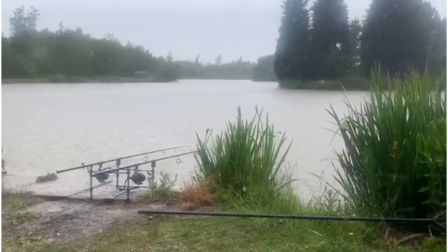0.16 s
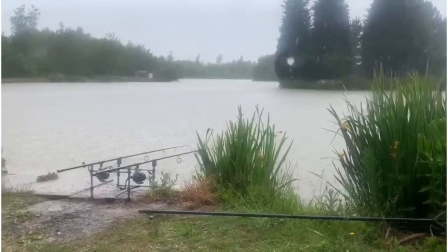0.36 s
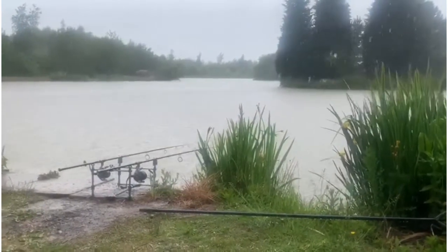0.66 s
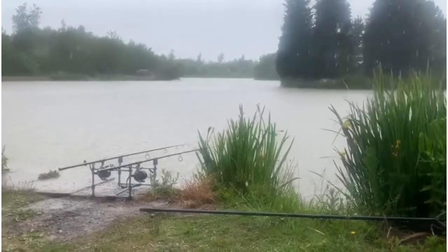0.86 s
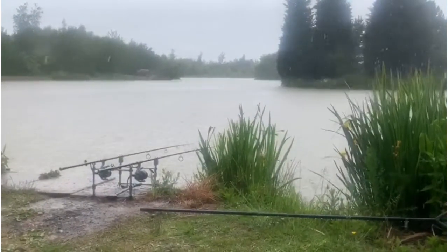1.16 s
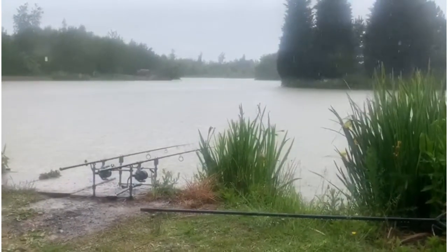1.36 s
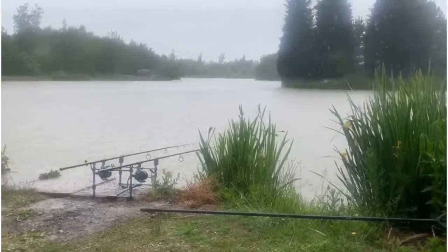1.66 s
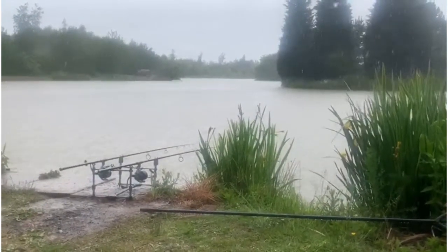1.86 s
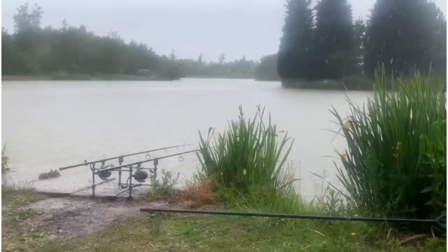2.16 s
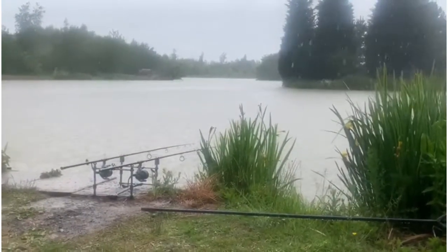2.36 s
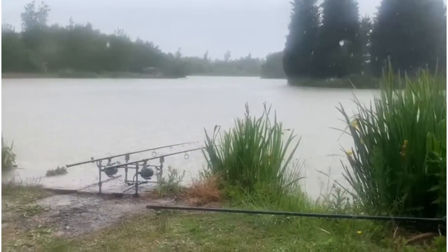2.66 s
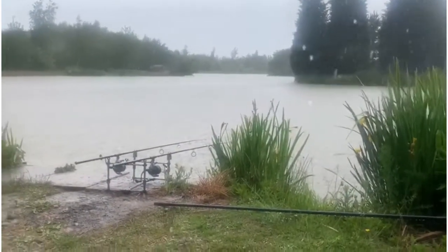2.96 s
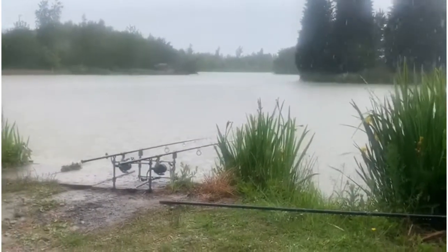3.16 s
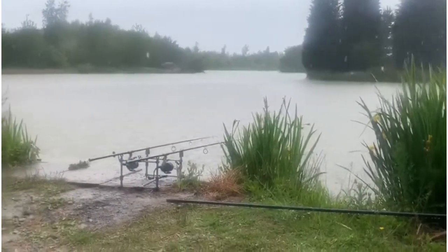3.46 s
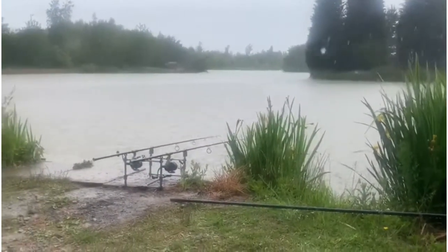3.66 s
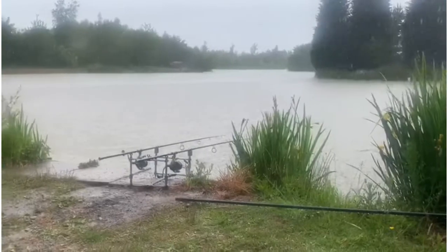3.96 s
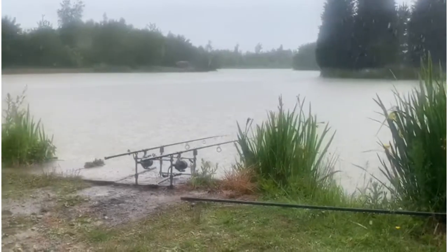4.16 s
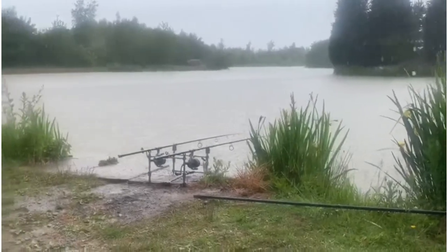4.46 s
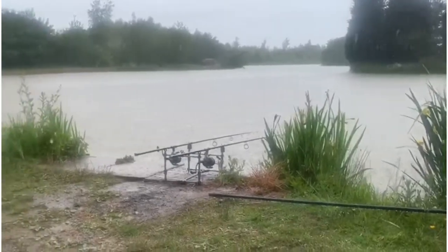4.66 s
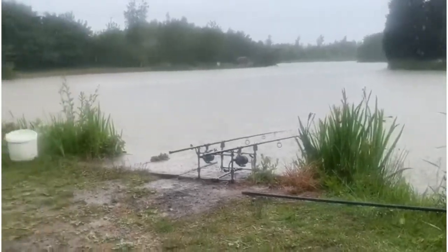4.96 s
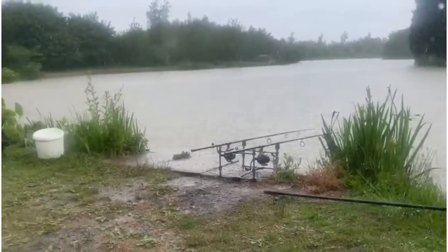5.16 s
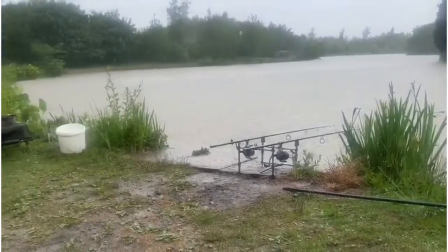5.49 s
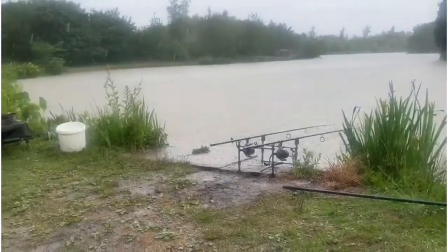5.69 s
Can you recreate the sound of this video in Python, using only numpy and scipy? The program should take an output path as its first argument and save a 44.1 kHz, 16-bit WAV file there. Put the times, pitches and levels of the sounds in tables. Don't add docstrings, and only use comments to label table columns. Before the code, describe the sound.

Heavy rain is already falling at 0 s and continues to the end, just under 6 s, without a break. Most of the sound is a dense, low-mid drumming on taut fabric close overhead, made of countless short, damped taps over a steadier dull rumble. Louder drops stand out at random: a busy cluster of fat, hollow plops in the first 0.8 s, a hard pat near 1.0, a brief flurry around 1.6-1.9, more near 2.1-2.3, and a strong crisp smack at 2.7. Thuds bunch at 3.1-3.4, a very sharp pat hits at 3.9, and scattered strikes follow from 4.6, with strong ones at 5.4-5.6 and slightly harder rain at the end. Behind lies a softer hiss of splashing and fine misty spray, with tiny drip ticks. The close phone stereo is wide and dry, with gently watery, smeared treble.

```python
import sys
import numpy as np
from scipy import signal
from scipy.fft import rfft, irfft, next_fast_len
from scipy.io import wavfile
from scipy.ndimage import uniform_filter1d, map_coordinates

SR = 44100
rng = np.random.default_rng(int(sys.argv[2]) if len(sys.argv) > 2 else 0)


def wav_record(signal):
    frames = np.transpose(np.atleast_2d(signal))
    bounded = np.clip(frames, -1, 1)
    quanta = np.round(bounded * 32767).astype(np.int16)
    wavfile.write(sys.argv[1], SR, quanta)


def convert_level_to_amplitude(level_db):
    exponent = np.asarray(level_db, float) / 20
    return 10 ** exponent


N = 257103

# (time [s], peak level [dB], pitch [Hz], left over right [dB])
FAT_DROPS = [(0.094, -17.5, 390, -2.5), (0.171, -17, 615, -0.5), (0.317, -15, 434, 1),
             (0.4, -16.5, 640, 9.5), (0.42, -17.5, 726, 1), (0.452, -20, 395, -4), (0.624, -17.5, 727, 4),
             (0.773, -20, 660, 10), (1.159, -18, 690, 2), (1.714, -20, 394, 2), (1.734, -28, 474, 3),
             (1.823, -21, 680, 5), (2.096, -19.5, 433, 8), (2.166, -17, 453, -1.5), (2.26, -19.5, 840, -1),
             (3.054, -20, 385, -4), (3.099, -15.5, 557, 0), (3.205, -18, 608, 1.5), (3.226, -18.5, 930, 10),
             (3.256, -16.5, 830, 1), (3.399, -20.5, 800, -0.5), (3.687, -16, 697, 1),
             (3.862, -18.5, 407, 8), (4.213, -17, 706, -3.5), (4.296, -22.5, 475, -7),
             (4.676, -16.5, 730, -1.5), (4.941, -19.5, 500, 3.5), (5.206, -16.5, 600, -4),
             (5.362, -14, 791, 0), (5.556, -22.5, 378, -4), (1.053, -27, 829, 5), (1.095, -20, 770, 8),
             (1.929, -25, 643, -13), (2.605, -23.5, 940, 4), (2.804, -23, 487, 1), (2.982, -21.5, 605, 1),
             (3.439, -24, 619, -6), (3.833, -22, 571, -2), (3.986, -18.5, 751, -2), (4.254, -20, 600, 3),
             (4.498, -27.5, 606, -1), (4.635, -23.5, 456, -0.5), (5.234, -19.5, 460, -6),
             (5.455, -29.5, 417, 4), (5.649, -17, 1140, -3)]
# (time [s], peak level [dB], pitch [Hz], left over right [dB])
CRISP_DROPS = [(0.1734, -23.5, 900, -6), (0.269, -23, 1040, 4), (0.2976, -31, 1030, -2),
               (0.3182, -19, 836, -5), (0.4204, -24.5, 840, -4), (0.4434, -37, 890, -4),
               (0.4713, -32, 926, 1.0), (0.5907, -14.5, 1110, -0.5), (0.625, -20.5, 902, 8),
               (0.734, -24, 972, 3), (0.783, -28, 796, 6), (0.877, -23, 1190, 0), (0.9612, -22.5, 1320, -2),
               (0.969, -21, 1340, 1), (1.0005, -15, 960, -6), (1.499, -25, 1660, -1), (1.56, -20.5, 990, 3),
               (1.6325, -18, 1180, -2), (1.7145, -27, 940, 15), (1.809, -18, 1160, 8),
               (1.825, -16.5, 966, 3), (1.9304, -27.5, 1320, -3), (2.0957, -17, 939, -6),
               (2.168, -15, 950, 3), (2.3035, -19.5, 840, -5), (2.382, -28, 1580, 1), (2.4915, -33, 845, 4),
               (2.7277, -12, 1210, -3), (3.2056, -29.5, 1050, -2), (3.2255, -31, 912, 10),
               (3.3998, -20.5, 900, 4), (3.687, -32, 837, 1), (3.8833, -10.5, 1080, 1.5),
               (3.9613, -16.5, 980, -10.5), (4.0307, -16.5, 824, 5), (4.072, -30, 1370, -8),
               (4.46, -41, 1570, 10), (4.4852, -24, 1160, 10), (4.599, -22, 1330, -5),
               (4.617, -14.5, 940, -5), (4.6688, -37, 1310, -1.0), (4.7517, -16, 805, -1),
               (4.7622, -20.5, 1340, -13), (4.895, -20.5, 990, -5), (4.9826, -21.5, 1220, -10),
               (5.211, -24, 880, 2), (5.4151, -22, 964, 7), (5.4829, -17, 1260, -6), (5.5562, -13, 953, 10),
               (5.6242, -17, 1230, -2)]
# (time [s], peak level [dB])
DRIP_TICKS = [(0.1144, -28.5), (0.4818, -26), (0.5881, -24), (0.635, -33), (1.3294, -31), (1.5449, -24),
              (1.6791, -42), (1.9809, -40), (2.2388, -48), (2.503, -35), (2.5331, -45), (2.7694, -57),
              (2.8685, -29), (2.9726, -37), (3.3345, -36), (3.4526, -31.5), (3.674, -30.5), (3.9964, -28),
              (4.3355, -58), (5.1332, -45), (5.226, -31), (5.4817, -30), (5.8027, -35)]


def roof(level_db):
    # (frequency [Hz], density [dB per Hz])
    canvas_colour = [(20, -25), (45, -8.5), (62, -6.5), (100, -6.5), (200, 0), (270, 0), (320, -4.5),
                     (400, 1.5), (520, -3), (800, -0.5), (1300, -4.5), (2000, -10), (3000, -21),
                     (6000, -35)]
    far = ports(patchy(depth_db=1.0, own_db=1.25, spiky_db=1.58, rate=150), canvas_colour)
    rumble = signal.sosfiltfilt(signal.butter(2, 327, fs=SR, output="sos"), far)
    mean_db = level_db.mean()
    steady_db = mean_db + 0.61 * (level_db - mean_db)
    drumming = convert_level_to_amplitude(level_db + 1.93) * (far - rumble) + convert_level_to_amplitude(steady_db + 2.2) * rumble
    near = patter(count=3000, centre_hz=719, spread=0.6, size_db=2.0, cycles=0.55)
    return drumming + convert_level_to_amplitude(level_db - 5.5) * near + fat_drops() + crisp_drops()


def fat_drops():
    blow_db, rebound_loss_db = 8, 6
    s, db, hz, pan_db = np.repeat(FAT_DROPS, 4, axis=0).T
    g = rng.standard_normal((len(s), 3))
    rebound = np.arange(len(s)) % 4
    s = s + 0.00152 + 0.0025 * rebound * np.exp(0.3 * g[:, 0])
    db = db + blow_db - rebound_loss_db * rebound
    hz = hz * np.exp(0.014 + 0.5 * g[:, 1] * (rebound > 0))
    gains = convert_level_to_amplitude(db + pan_db / 2), convert_level_to_amplitude(db - pan_db / 2)
    return thuds(s, gains, hz, cycles=0.74, lag=12 + 4 * g[:, 2])


def crisp_drops():
    s, db, hz, pan_db = np.transpose(CRISP_DROPS)
    db = db + 7.5
    gains = convert_level_to_amplitude(db + pan_db / 2), convert_level_to_amplitude(db - pan_db / 2)
    lag = 12 + 3 * rng.standard_normal(len(s))
    return thuds(s + 0.00034, gains, 1.1 * hz, cycles=0.58, lag=lag)


def patter(count, centre_hz, spread, size_db, cycles):
    u, g = rng.random((count, 3)), rng.standard_normal((count, 4))
    polarity = np.sign(g[:, 3] + 0.5)
    size = convert_level_to_amplitude(-size_db * np.log(1 - 0.985 * u[:, 1])) * polarity
    hz = centre_hz * np.exp(spread * g[:, 0])
    one_slope, anywhere = 12 + 1.1 * g[:, 1], 8 + 22 * g[:, 1]
    lag = np.where(u[:, 2] < 0.4, one_slope, anywhere).clip(-90, 90)
    side = convert_level_to_amplitude(2.83 * g[:, 2])
    return unit(thuds(u[:, 0] * N / SR, (size * side, size / side), hz, cycles, lag))


def thuds(s, gains, hz, cycles, lag):
    length, margin = 400, 100
    t = np.arange(length) / SR
    turns = hz[:, None] * t
    turns = turns + 0.81 * (1 - np.exp(-3.5 * turns))
    decay = np.exp(-t * (hz / cycles)[:, None])
    attack = 1 - np.exp(-t / 0.00032)
    fade = np.hanning(2 * length)[length:]
    swing = np.sin(2 * np.pi * turns) * decay * attack * fade
    out = []
    for gain, late in zip(gains, (lag / 2, -lag / 2)):
        start = np.round(s * SR + late).astype(int)
        at = start[:, None] + np.arange(length) + margin
        heard = np.bincount(at.ravel(), (gain[:, None] * swing).ravel(), N + 1000)
        out.append(heard[margin:N + margin])
    return np.array(out)


def splashes(level_db):
    # (frequency [Hz], density [dB per Hz])
    splash_colour = [(500, -30.5), (1500, 0), (2000, -4.5), (3000, -7.5), (4500, -10.5), (6000, -14.5),
                     (7000, -15.5), (8010, -16.5), (8050, -64)]
    hiss = ports(patchy(depth_db=1.5, own_db=2.0, spiky_db=0.5, rate=270), splash_colour)
    pats = patter(count=1800, centre_hz=1825, spread=0.34, size_db=-6.0, cycles=1.9)
    pats = signal.sosfilt(signal.butter(6, 6000, fs=SR, output="sos"), pats)
    return convert_level_to_amplitude(level_db + 4.5) * hiss + convert_level_to_amplitude(level_db - 9.5) * pats


def spray(level_db):
    # (frequency [Hz], density [dB per Hz])
    mist_colour = [(7970, -53), (8020, 1), (9500, 0.5), (11400, 0.5), (11700, -1), (11950, -10),
                   (12300, -80)]
    # (time [s], peak level [dB])
    close_ticks = [
        (0.588, -55),
        (1.5446, -47),
        (2.8674, -51),
        (4.5501, -45),
    ]
    mist = ports(patchy(depth_db=-1.0, own_db=1.0, spiky_db=1.24, rate=310), mist_colour)
    band = signal.butter(4, [5000, 11000], "band", fs=SR, output="sos")
    unlike = unit(signal.sosfilt(band, rng.standard_normal((2, N))))
    ticks = bursts(DRIP_TICKS, boost_db=-6.5, width_s=0.000975)
    close = bursts(close_ticks, boost_db=12, width_s=0.001105) * unlike
    return (convert_level_to_amplitude(level_db + 4.0) + ticks) * mist + close


def bursts(rows, boost_db, width_s):
    t, out = np.arange(N) / SR, np.zeros(N)
    for s, db in rows:
        near = slice(round(s * SR) - 100, round(s * SR) + 900)
        late = (t[near] - s) / width_s
        out[near] += convert_level_to_amplitude(db + boost_db) * np.exp(-(late - 1) ** 2)
    return out


def levels():
    # (time [s], level [dB])
    rain_strength = [(0.0, -28.5), (1.54, -29), (1.64, -25.5), (1.69, -34.5), (1.72, -27.5), (1.9, -30),
                     (2.14, -28.5), (3.51, -30.5), (3.54, -26), (3.59, -31), (3.67, -29), (3.78, -32.5),
                     (3.82, -28), (4.87, -29), (5.57, -27.5), (5.59, -29), (5.78, -25.5), (5.83, -26)]
    rain_db = np.interp(np.arange(N) / SR, *np.transpose(rain_strength))
    swing_db = rain_db - rain_db.mean()
    squall_db = 2.14 * swell(FAT_DROPS, typical_db=-17, width_s=0.011)
    halo_db = 2 * swell(DRIP_TICKS, typical_db=-30, width_s=0.017)
    flare_db = 1.5 * swell(CRISP_DROPS, typical_db=-17, width_s=0.006)
    canvas_db = rain_db + squall_db
    splash_db = -41 + 0.51 * (swing_db + squall_db) + 0.68 * halo_db + flare_db - 0.24 * wobble(15)
    spray_db = -50.5 + 0.1 * swing_db + halo_db + 1.5 * wobble(9.4)
    return canvas_db, splash_db, spray_db


def swell(rows, typical_db, width_s):
    t = np.arange(0, N, 64) / SR
    bumps = np.zeros(len(t))
    for row in rows:
        bumps += convert_level_to_amplitude(row[1] - typical_db) * np.exp(-((t - row[0]) / width_s - 0.4) ** 2)
    return np.interp(np.arange(N) / SR, t, bumps - bumps.mean())


def ports(pair, colour):
    # (frequency [Hz], likeness [0-1])
    body_likeness = [(0, .9), (250, .86), (450, .35), (1000, .25), (1600, .15), (2000, .3), (2600, .1),
                     (3700, .25), (4600, .1)]
    # (frequency [Hz], likeness [0-1], right leads [rad])
    treble_likeness = [(5400, .5, 9.42), (5900, .1, 8), (6600, .6, 6.28), (7250, .3, 7.6), (7650, .8, 9.1),
                       (8200, .98, 9.42), (9000, .98, 9.42), (9450, .87, 9.85), (9800, .45, 11),
                       (10350, .97, 12.57)]
    # (frequency [Hz], left over right [dB])
    port_tilt = [(60, 0.5), (180, -2.5), (350, -3.5), (700, 0.44), (3000, -0.7)]
    port_lag_s = 12.2 / 44100
    m = next_fast_len(N + 8192)
    hz = np.fft.rfftfreq(m, 1 / SR)
    body = [(f, alike, 2 * np.pi * f * port_lag_s) for f, alike in body_likeness]
    f, alike, lead = np.transpose(body + list(treble_likeness))
    turn = np.arccos(np.clip(np.interp(hz, f, alike), 0, 1)) / 2
    tilt = convert_level_to_amplitude(-np.interp(hz, *np.transpose(port_tilt)) / 2)
    lead = np.exp(0.5j * np.interp(hz, f, lead)) * tilt
    f, db = np.transpose(colour)
    tint = convert_level_to_amplitude(np.interp(np.log(hz + 1), np.log(f), db))
    a, b = rfft(pair, m) * tint * [np.cos(turn), np.sin(turn)]
    return unit(irfft([(a + b) / lead, (a - b) * lead], m)[:, :N])


def patchy(depth_db, own_db, spiky_db, rate):
    z = signal.stft(rng.standard_normal((2, N)), nperseg=1024)[2]
    field = random_field((3,) + z.shape[1:], 6, 6)
    patches = convert_level_to_amplitude(depth_db * field[0] + own_db * field[1:])
    pair = signal.istft(z * patches, nperseg=1024)[1][:, :N]
    return pair * convert_level_to_amplitude(spiky_db * wobble(rate))


def random_field(shape, size_1, size_2):
    field = uniform_filter1d(rng.standard_normal(shape), size=size_1, axis=1)
    return unit(uniform_filter1d(field, size=size_2, axis=2))


def wobble(rate):
    knots = rng.standard_normal(int(N * rate / SR) + 4)
    return map_coordinates(knots, [np.arange(N) * rate / SR])


def unit(x):
    return x / np.sqrt(np.mean(x ** 2) + 1e-20)


def scene():
    canvas_db, splash_db, spray_db = levels()
    soft = signal.butter(6, 5500, fs=SR, output="sos")
    return signal.sosfilt(soft, roof(canvas_db)) + splashes(splash_db) + spray(spray_db)


def masked(x):
    # (frequency [Hz], level over one step [dB], wander from cell to cell [dB])
    fineness_by_region = [(200, 20, 5), (800, 11, 5), (1600, 7.5, 4.5), (3000, 5.5, 3.5), (5300, 2.5, 3),
                          (7200, 2.5, 2.5), (7900, 4, 5), (8500, 4, 3), (9200, 4.5, 3.5), (9800, 4.5, 2),
                          (11500, 4, 1.5), (11900, 2, 4)]
    drop_db, rounding = -4.5, 0.38
    hop, grid, cells, width = 1024, 486, 70, 8
    window = signal.windows.kaiser_bessel_derived(2 * hop, 4 * np.pi)
    phase = np.outer(np.arange(cells * width) + 0.5, np.arange(2 * hop) + 0.5 + hop / 2)
    waves = window * np.cos(np.pi / hop * phase)

    pair = np.pad([x[0] + x[1], x[0] - x[1]], ((0, 0), (2 * hop - grid, 2 * hop)))
    starts = np.arange(0, pair.shape[1] - 2 * hop, hop)
    lines = pair[:, starts[:, None] + np.arange(2 * hop)] @ waves.T
    lines = lines * streaks(lines.shape, SR / (2 * hop))
    lines = lines.reshape(2, len(starts), cells, width)

    power = np.mean(lines ** 2, axis=3)
    around = uniform_filter1d(power.max(axis=0), size=3, axis=0)
    around = uniform_filter1d(around, size=7, axis=1)
    hz, fine_db, wander_db = np.transpose(fineness_by_region)
    centre = (np.arange(cells) + 0.5) * width * SR / (2 * hop)
    mood = random_field(power.shape, 3, 2)
    step_db = np.interp(centre, hz, wander_db) * mood - np.interp(centre, hz, fine_db)
    step = np.sqrt(around + 1e-20) * convert_level_to_amplitude(step_db)
    alive = uniform_filter1d(power, size=2, axis=1) > (step * convert_level_to_amplitude(drop_db)) ** 2
    alive, step = alive[..., None], step[..., None]
    rounded = np.floor(abs(lines / step) ** 0.75 + rounding) ** (4 / 3)
    lines = alive * np.sign(lines) * step * rounded

    blocks = lines.reshape(2, len(starts), -1) @ waves * 2 / hop
    joined = blocks[:, 1:, :hop] + blocks[:, :-1, hop:]
    mid, side = joined.reshape(2, -1)[:, hop - grid:][:, :N]
    return np.array([mid + side, mid - side]) / 2


def streaks(shape, line_hz):
    # (frequency [Hz], depth [dB])
    streak_depth = [(300, .5), (700, 1.5), (2000, 2.5), (5000, 4), (7500, 3), (10000, 1.5)]
    field = random_field(shape, 5, 3)
    gain = convert_level_to_amplitude(np.interp(np.arange(shape[2]) * line_hz, *np.transpose(streak_depth)) * field)
    return gain / np.sqrt(np.mean(gain ** 2, axis=(0, 1)))


def low_pass(x):
    return signal.sosfilt(signal.butter(12, 12050, fs=SR, output="sos"), x)


def record(dry):
    kept = signal.sosfilt(signal.butter(2, 50, "high", fs=SR, output="sos"), dry)
    kept = signal.sosfilt(signal.butter(12, 11800, fs=SR, output="sos"), kept)
    mix = masked(kept)
    return low_pass(mix)


dry = scene()
out = record(dry)
wav_record(out)
```